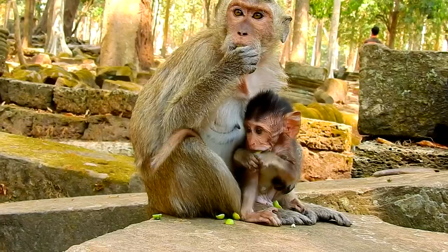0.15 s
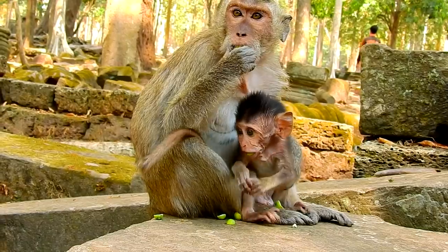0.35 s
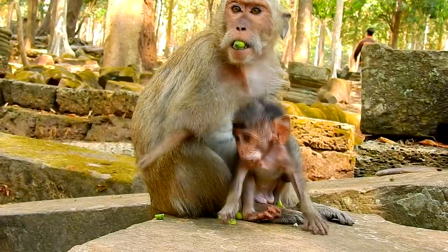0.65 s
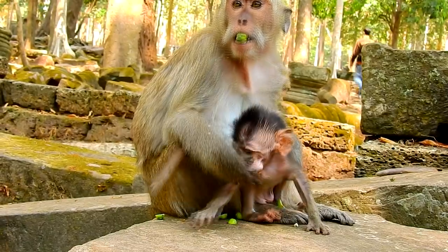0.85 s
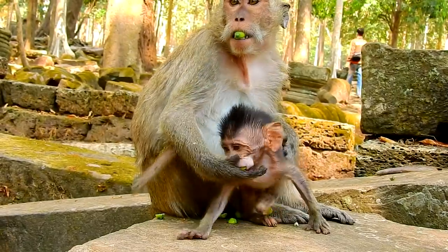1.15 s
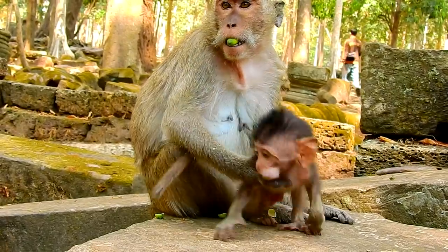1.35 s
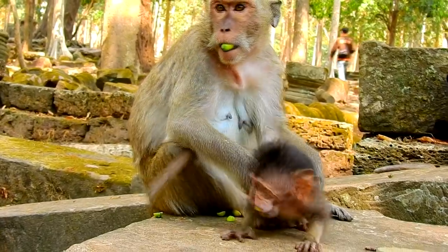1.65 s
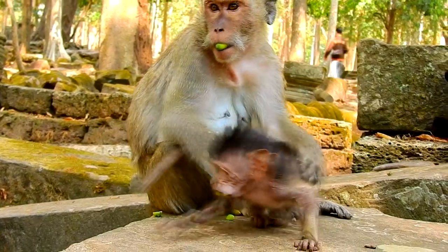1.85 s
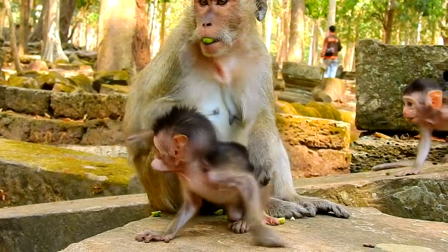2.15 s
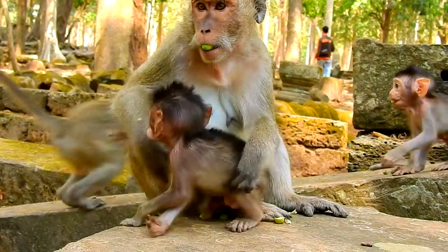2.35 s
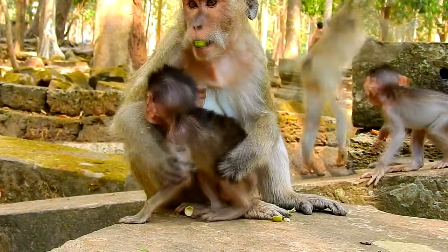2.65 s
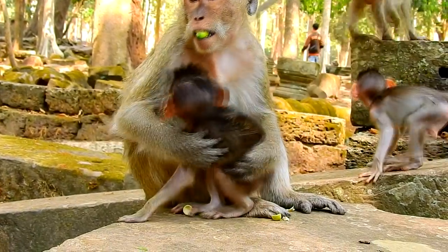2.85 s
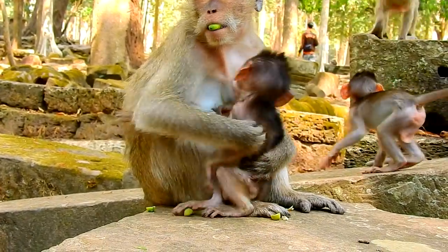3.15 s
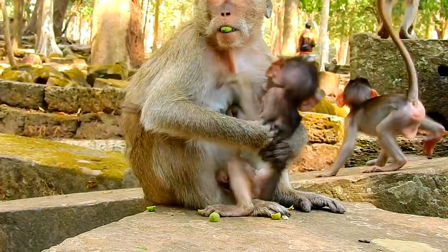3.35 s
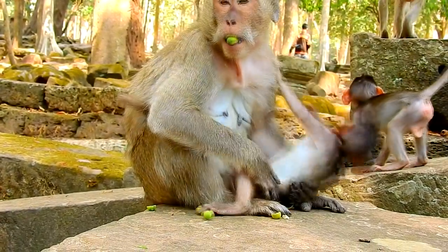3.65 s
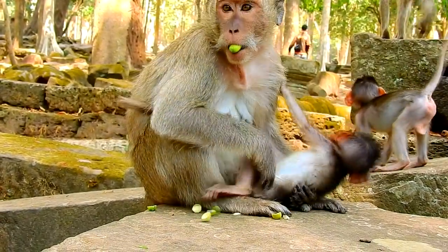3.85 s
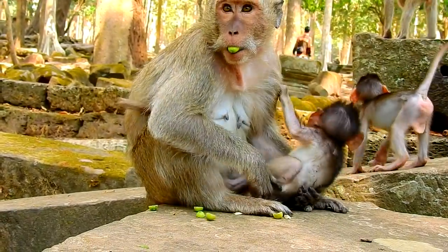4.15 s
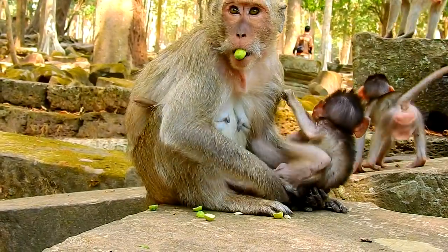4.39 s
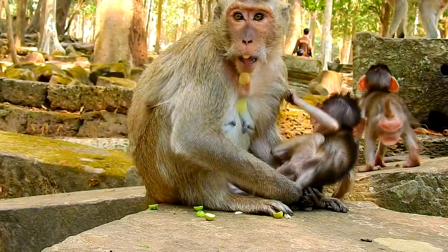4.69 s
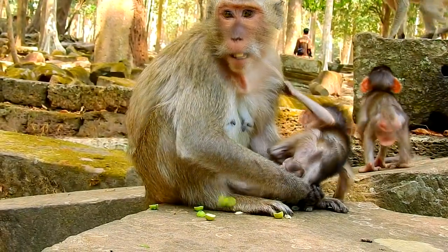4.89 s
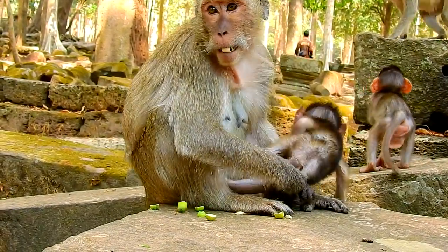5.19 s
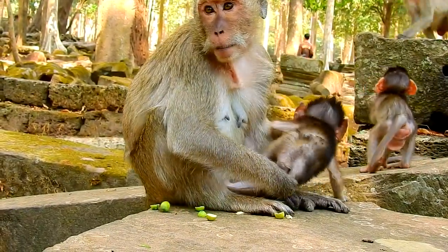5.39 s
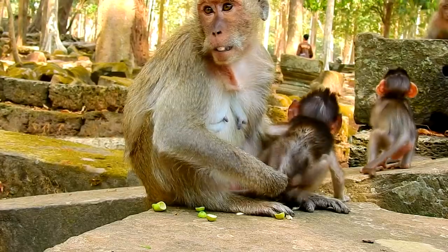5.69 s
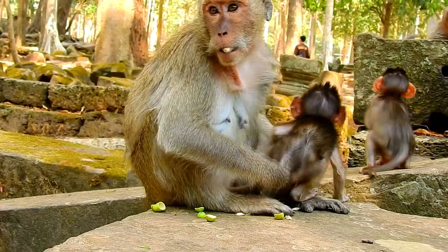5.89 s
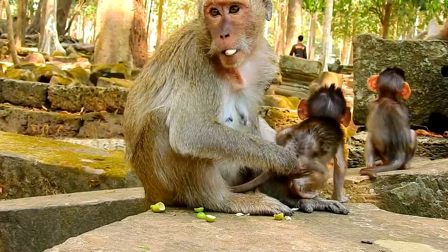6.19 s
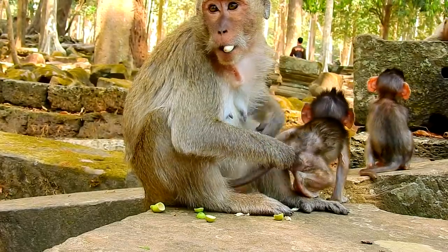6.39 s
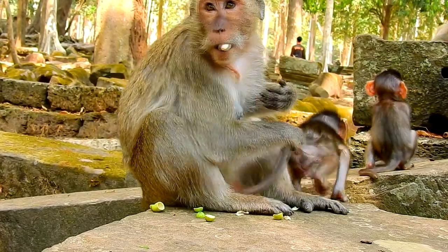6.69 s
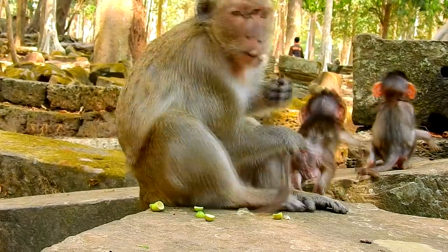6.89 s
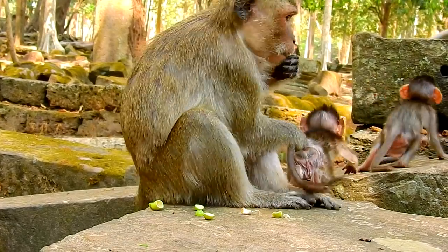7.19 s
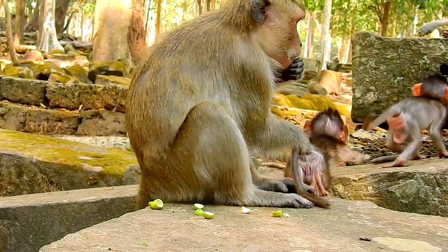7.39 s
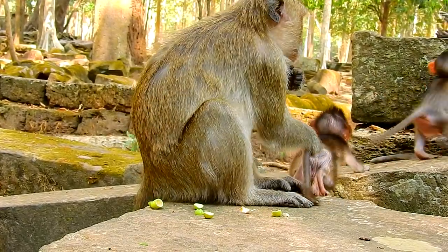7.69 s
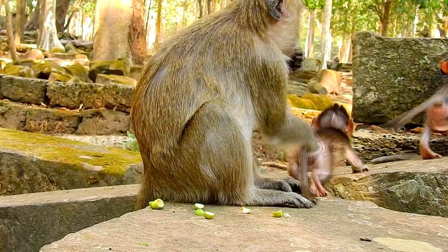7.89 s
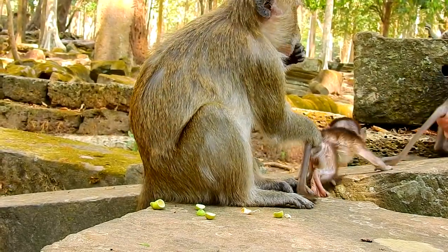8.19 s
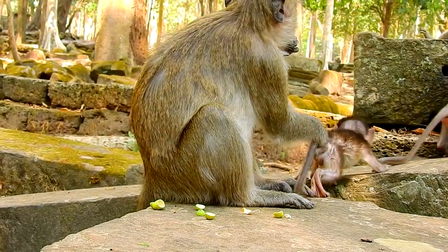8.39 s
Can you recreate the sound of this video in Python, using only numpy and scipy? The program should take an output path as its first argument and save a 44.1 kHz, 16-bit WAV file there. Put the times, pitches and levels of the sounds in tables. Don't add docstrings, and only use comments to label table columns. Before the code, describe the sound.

Throughout, cicadas in trees all around form a dense, shrill, wide stereo drone, a grainy ringing buzz mostly from about 3 to 9 kHz, with only small swells. Underneath lies soft far-traffic rumble and a low, slightly sagging engine hum. From 0 to 6 seconds a slow single-cylinder vehicle pulls away behind the trees, slightly right, its blurred boom slowly climbing in pitch and swelling unevenly, with a rougher rasp strongest at the start. Between 3 and 4.7 seconds a second engine thumps past, revving around 3.7 and 4.3. At about 6 the first engine cuts briefly, runs lightly in another gear until 6.9, pauses, then chugs lower from 7.2 to the end. Near 6.9 one high insect layer thins, then returns as the others strengthen. The monkeys make no audible sound; small outdoor stereo microphone, faintly filtered.

```python
import sys
import numpy as np
from scipy import signal
from scipy.fft import rfft, irfft, next_fast_len
from scipy.io import wavfile

SR = 44100
rng = np.random.default_rng(int(sys.argv[2]) if len(sys.argv) > 2 else 0)


def volts_from_decibels(level):
    exponent = np.asarray(level, float) / 20
    return 10 ** exponent


def digitize_waveform(pressure):
    field = np.atleast_2d(pressure).T
    bounded = np.clip(field, -1, 1)
    quanta = np.round(bounded * 32767).astype(np.int16)
    wavfile.write(sys.argv[1], SR, quanta)


N = 376613
TIME = np.arange(N) / SR
SIZE = next_fast_len(N)
HZ = np.arange(SIZE // 2 + 1) * SR / SIZE + 1e-3


def level(x, db):
    return x * volts_from_decibels(db) / np.sqrt(np.mean(x ** 2))


def over_hz(table):
    hz, value = np.transpose(table)
    return np.interp(np.log(HZ), np.log(hz), value)


def walk(rate_hz):
    steps = int(rate_hz * N / SR) + 2
    return np.interp(TIME, np.arange(steps) / rate_hz, rng.standard_normal(steps))


def swells(*rows):
    slow = TIME[::64]
    bells = sum(db * np.exp(-((slow - peak_s) / spread_s) ** 2) for peak_s, spread_s, db in rows)
    return np.interp(TIME, slow, bells)


def singers(body, db, lo_hz, hi_hz, lean_db, spread_db, lag_us, span_us, count=5):
    power = sum(volts_from_decibels(2 * g) / (1 + ((HZ - f * f / HZ) / w) ** 2) ** 2 for f, w, g in body)
    ring = np.sqrt(power / power[(HZ > lo_hz) & (HZ < hi_hz)].sum())
    ports = 0
    for place in np.linspace(-1, 1, count):
        rates_hz = rng.uniform(250, 450, (24, 1))
        gaps_s = (1 + 0.3 * rng.standard_normal((24, int(470 * N / SR)))) / rates_hz
        at = (np.cumsum(gaps_s, axis=1) * SR).astype(int) - SR // 50
        clicks = np.bincount(at[(at >= 0) & (at < N)], minlength=N) * 1.0
        clicks = level(clicks - clicks.mean(), db + 0.86 * walk(4))
        gap_db = lean_db + spread_db * place
        delay_us = lag_us + span_us * place
        left = volts_from_decibels(gap_db / 2) * np.exp(-1j * np.pi * HZ * delay_us / 1.28e6)
        ports = ports + rfft(clicks, SIZE) * np.array([left, 1 / left])
    return ports * ring * np.sqrt(SIZE / 2 / count)


# centre_hz, width_hz, level_db
LOW_BODY = [(1750, 240, -7), (1837, 540, -12.5), (3243, 505, -4.5), (3468, 450, 0.5), (3795, 670, -6),
            (2500, 4150, -20)]
BROAD_BODY = [(4290, 530, -5.5), (5173, 1260, -2.5), (6070, 1470, -2.5), (6940, 990, 0.5), (7150, 62, 2)]
HIGH_BODY = [(7906, 700, 13), (9000, 1000, -12)]
TOP_BODY = [(9400, 660, 13.5), (11040, 840, 2.5), (11160, 1800, 0.5), (13100, 920, -5), (14800, 900, -16)]
# peak_s, spread_s, level_db
LOW_SWELLS = [
    (0.7, 0.63, -0.1),
    (3.5, 0.51, -0.6),
    (7.8, 1.1, 0.37),
]
BROAD_SWELLS = [
    (6.4, 0.38, -0.3),
    (8.2, 1.2, 0.86),
]
HIGH_LULL = (6.9, 0.9, -11.5)
TOP_SWELLS = [
    (0.5, 0.7, 1),
    (2.6, 0.92, -1.5),
    (4.6, 0.55, 1),
    (5.6, 0.5, 0),
    (6.3, 0.6, 2),
    (7.5, 1.1, 4),
]


def cicadas():
    low = singers(LOW_BODY, -27.5 + swells(*LOW_SWELLS), 2930, 3672,
                  lean_db=-1.6, spread_db=6.5, lag_us=3, span_us=36.1)
    broad = singers(BROAD_BODY, -24 + swells(*BROAD_SWELLS), 5070, 7290,
                    lean_db=-0.55, spread_db=11.5, lag_us=20.0, span_us=55.4)
    high = singers(HIGH_BODY, -31.5 + swells(HIGH_LULL), 7600, 9000,
                   lean_db=0.0, spread_db=2.0, lag_us=50, span_us=26)
    top = singers(TOP_BODY, -63 + swells(*TOP_SWELLS), 11000, 14000,
                  lean_db=0, spread_db=7.0, lag_us=70, span_us=17.7, count=2)
    air_start_hz, air_db_per_khz = 8690, -11.5
    air = volts_from_decibels(air_db_per_khz * np.clip(HZ - air_start_hz, 0, None) / 1000)
    return irfft((low + broad + high) * air + top, SIZE)[:, :N]


def overtones(hz, parts, unsteady, flutter_db, blur):
    turn = 2 * np.pi * np.cumsum(hz * (1 + unsteady * walk(6))) / SR
    out = 0
    for k, db in parts:
        loudness = np.sqrt(2) * volts_from_decibels(db + flutter_db * walk(7))
        out = out + loudness * np.cos(k * turn + blur * rng.standard_normal())
    return out


def running(start_s, stop_s):
    fade_s, mute_db = 0.1, -27
    inside_s = np.minimum(TIME - start_s, stop_s - TIME)
    return mute_db * (1 - np.clip(inside_s / fade_s + 1, 0, 1))


# start_s, stop_s, first_hz, goal_hz, climb_s (firing rates)
GEARS = [
    (-0.1, 5.97, 28.7, 39.4, 6.6),
    (6.06, 6.85, 32.2, 30.6, 0.2995),
    (7.22, 8.7, 26.8, 27.0, 0.5),
]


def gearbox():
    clutch_s = 0.1
    hz = np.zeros(N)
    for start_s, stop_s, first_hz, goal_hz, climb_s in GEARS:
        since_s = TIME - start_s
        gear_hz = goal_hz + (first_hz - goal_hz) * np.exp(-since_s.clip(0) / climb_s)
        hz = np.where(since_s > -clutch_s, gear_hz, hz)
    clutch_db = np.max([running(*gear[:2]) for gear in GEARS], axis=0)
    return hz, clutch_db


# overtone, level_db
HAULER_BOOM = [(2, -42), (4, -42), (5, -42.5), (6, -46.5)]
# peak_s, spread_s, overtone, lift_db
BOOMS = [(0.0, 0.15, 5, 11), (0.85, 0.25, 4, 5.5), (1.5, 0.33, 4, 15), (1.5, 0.31, 5, 11.5),
         (1.9, 0.31, 2, 3), (2.45, 0.37, 5, 12), (3.2, 0.51, 5, 7), (3.2, 0.57, 4, 13),
         (3.3, 0.77, 6, 10.5), (4.2, 0.26, 4, 13), (4.85, 0.26, 2, 13.5), (4.98, 0.26, 5, 13),
         (5.1, 0.36, 6, 9.5), (5.5, 0.47, 2, 9), (6.15, 0.12, 4, 17.5), (6.55, 0.15, 4, 14.5),
         (3.65, 0.25, 5, 3), (0.5, 0.58, 6, 9), (4.6, 0.15, 6, 9.5), (7.7, 0.3, 5, 14.5),
         (8.3, 0.34, 5, 16), (7.7, 0.28, 6, 9), (8.3, 0.42, 6, 12)]
# overtone, level_db (over the 9th)
HAULER_RASP = [(3, 7), (7, -7.5), (8, -5.5), (9, 0.5), (10, 0), (11, -3), (12, -12), (13, -19)]


def hauler(load_db):
    hz, clutch_db = gearbox()
    boom_parts = []
    for k, db in HAULER_BOOM:
        lifts = [(s, spread, lift) for s, spread, which, lift in BOOMS if round(which) == k]
        boom_parts.append((k, db + swells(*lifts) + clutch_db))
    boom = overtones(hz, boom_parts, unsteady=0.0037, flutter_db=1.0, blur=2.63)
    rasp_db = -48 + 1.37 * load_db + clutch_db
    rasp_parts = [(k, rasp_db + db) for k, db in HAULER_RASP]
    return boom + overtones(hz, rasp_parts, unsteady=0.00696, flutter_db=4.5, blur=2.3)


# pitch_hz, sag_hz_per_s, level_db, fade_db_per_s
HUM = (52.5, -0.5, -44, -0.5)


def hum():
    hz, sag, db, fade = HUM
    return overtones(hz + sag * TIME, [(0.99, db + fade * TIME)], unsteady=0.0083, flutter_db=-3.0, blur=0)


# pitch_hz, level_db (per Hz)
FAR = [(15, -43.5), (25, -35), (55, -3), (129, 3.5), (165, -2.5), (216, -14), (327, -15.5), (437, -23),
       (595, -25.5), (838, -25), (1180, -26), (1400, -31), (1500, -22.5), (1950, -53), (3300, -120)]
# pitch_hz, side_minus_mid_db
FAR_SIDE = [(60, -40), (180, -21), (320, -16), (560, -13), (1200, -14.5)]
# peak_s, spread_s, level_db
RUMBLE_SWELLS = [
    (3.4, 0.21, 2.5),
    (4.3, 0.19, -7),
    (6.85, 0.13, 2),
    (7.35, 0.16, -2),
]
HUSH_SWELL = (4.6, 1.5, 2.5)


def traffic(load_db):
    rumble_db = -28 + swells(*RUMBLE_SWELLS)
    growl_db = -39 + 0.8 * load_db + 2.2 * walk(4)
    hush_db = -44.5 + swells(HUSH_SWELL)
    colour, side = volts_from_decibels(over_hz(FAR)), volts_from_decibels(over_hz(FAR_SIDE))
    out = 0
    for lo_hz, hi_hz, db in ((5, 230, rumble_db), (206, 457, growl_db), (460, 3000, hush_db)):
        band = colour / np.sqrt((1 + (lo_hz / HZ) ** 8) * (1 + (HZ / hi_hz) ** 8))
        mid, wide = (rfft(rng.standard_normal(N), SIZE) * band for _ in range(2))
        pair = irfft(mid + wide * side * np.array([[1], [-1]]), SIZE)[:, :N]
        out = out + level(pair, db + 0.9 * walk(6))
    return out


# start_s, stop_s, level_db
THUMPER = (3, 4.7, -36)
# overtone, level_db
THUMPER_PIPE = [(4, -7), (5, 0.5), (6, -1), (7, -7), (8, -5), (9, -12.5)]
# peak_s, spread_s, level_db
THUMPER_REVS = [
    (3.7, 0.13, 6),
    (4.3, 0.18, 8.5),
    (4.7, 0.15, 4),
]


def thumper():
    start_s, stop_s, db = THUMPER
    db = db + running(start_s, stop_s) + swells(*THUMPER_REVS)
    parts = [(k, db + pipe_db) for k, pipe_db in THUMPER_PIPE]
    return overtones(19.17, parts, unsteady=0.003, flutter_db=3.5, blur=0)


# time_s, load_db
LOAD = [
    (0, 3.5),
    (1.0, 0.5),
    (2.7, -0.5),
    (3.0, 0.5),
    (4.4, -1.5),
    (5.1, -1),
    (5.9, -2),
    (6.6, -10.5),
    (7.8, -1),
    (8.54, -4.5),
]


def scene():
    load_db = np.interp(TIME, *np.transpose(LOAD))
    road = hauler(load_db) + hum() + traffic(load_db) + thumper()
    return cicadas() + road * volts_from_decibels(np.array([[-0.47], [0.47]]))


def roll_off(x):
    return signal.sosfilt(signal.butter(12, 15160, fs=SR, output="sos"), x)


# pitch_hz, echo_share
COMB = [(2800, 0.038), (3200, 0.28), (3500, 0.32), (3700, 0.24), (3900, 0.76), (4010, .5), (4040, 0.35),
        (4070, 0.12)]


def record(dry):
    echo_s = 1 / 98.07
    comb = 1 - np.clip(over_hz(COMB), 0, 0.9) * np.exp(-2j * np.pi * HZ * echo_s)
    mix = irfft(rfft(dry, SIZE) * comb, SIZE)[:, :N]
    return roll_off(mix)


dry = scene()
out = record(dry)
digitize_waveform(out)
```